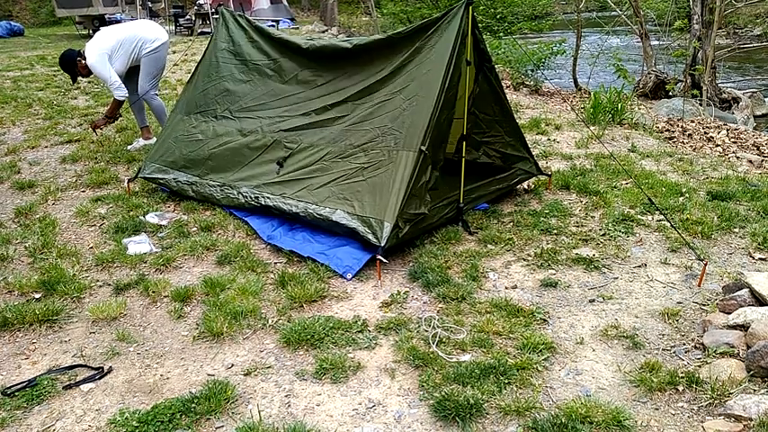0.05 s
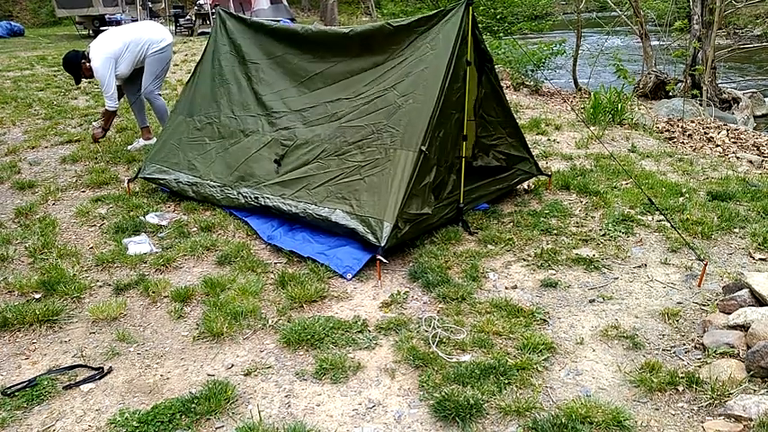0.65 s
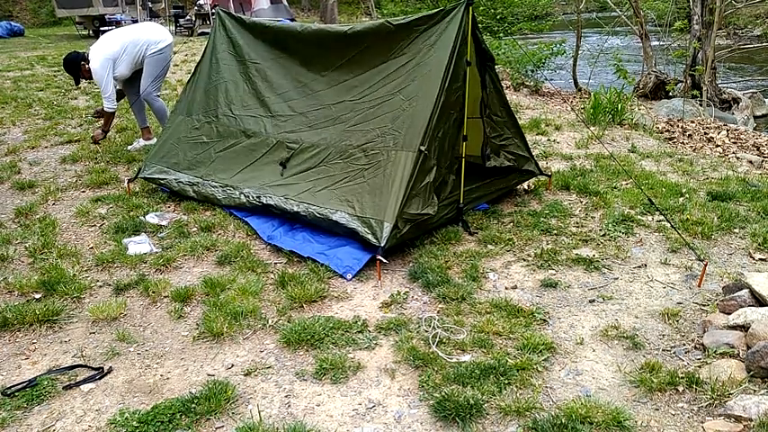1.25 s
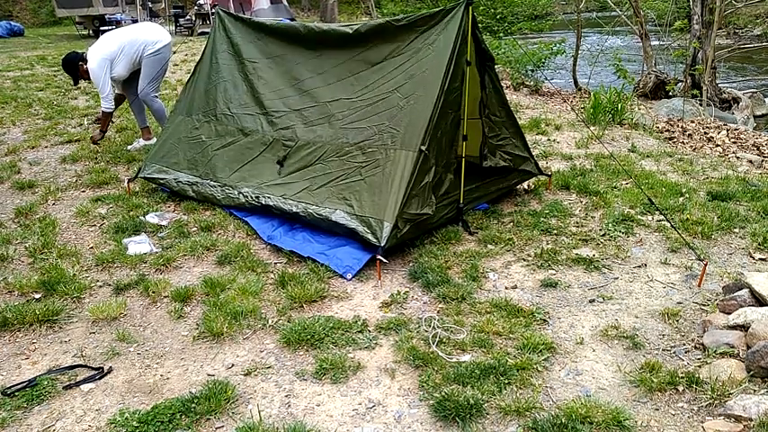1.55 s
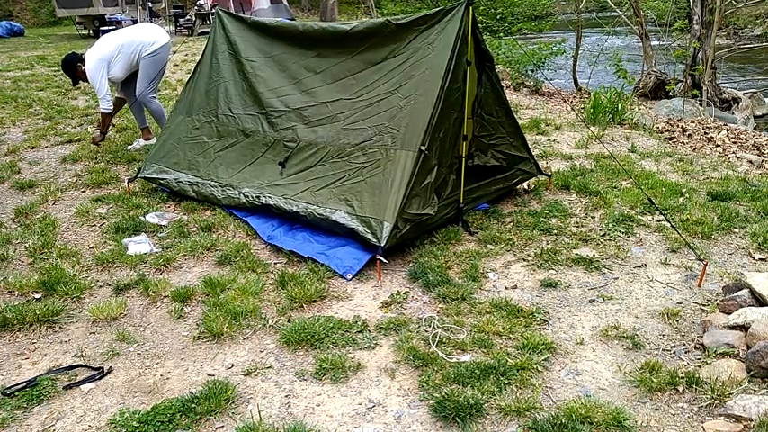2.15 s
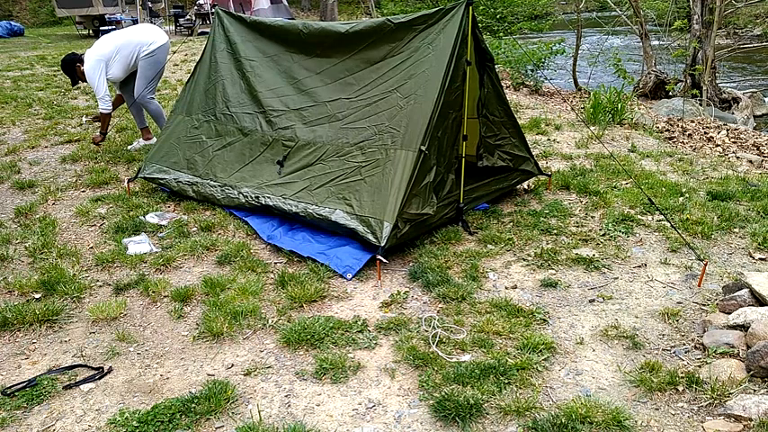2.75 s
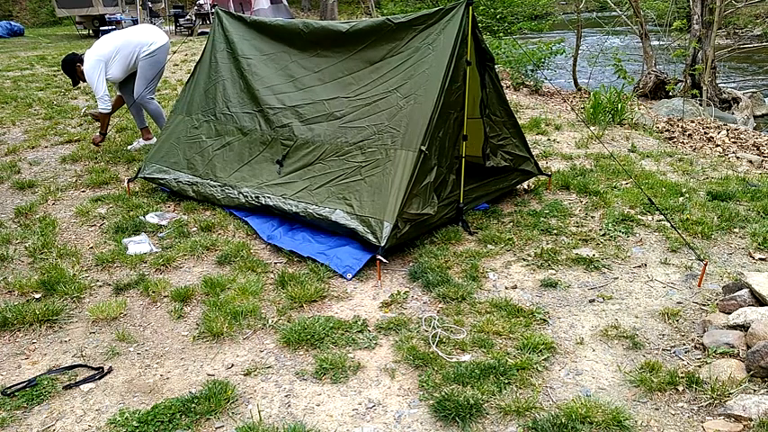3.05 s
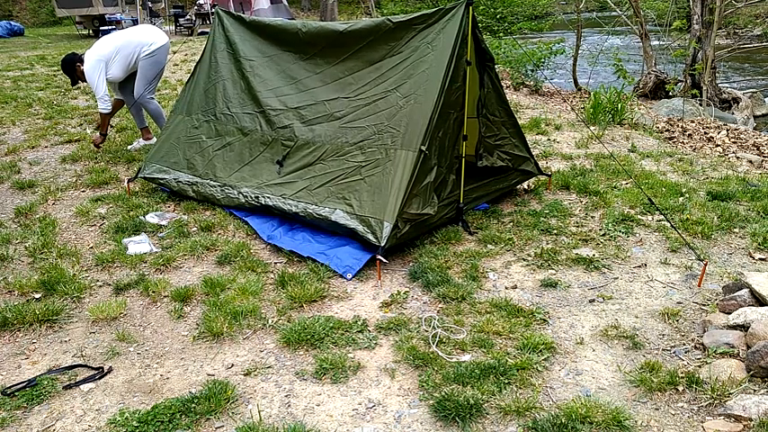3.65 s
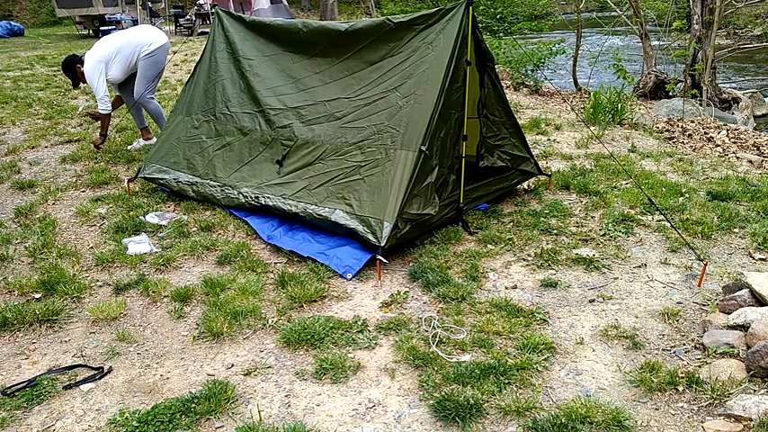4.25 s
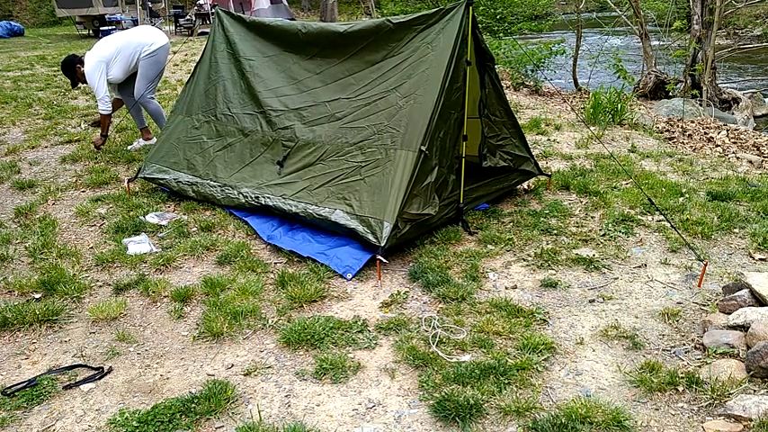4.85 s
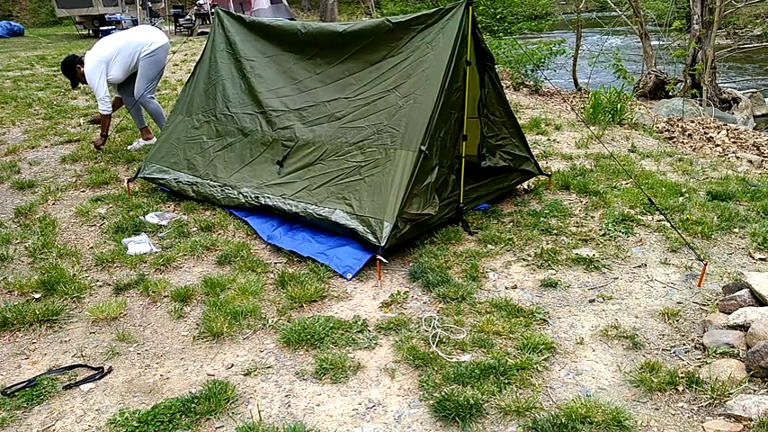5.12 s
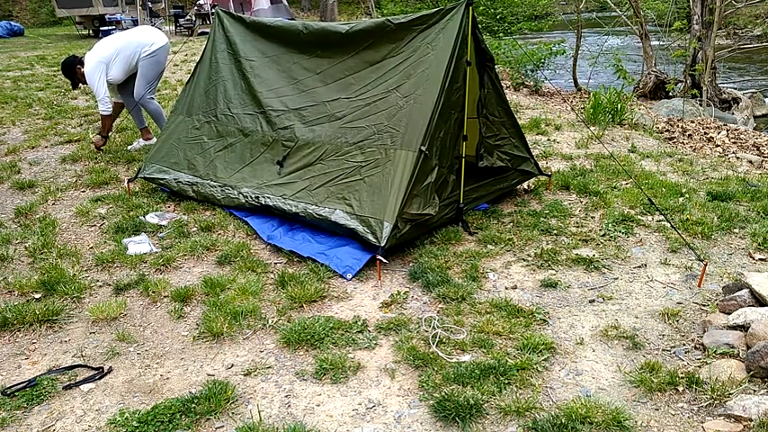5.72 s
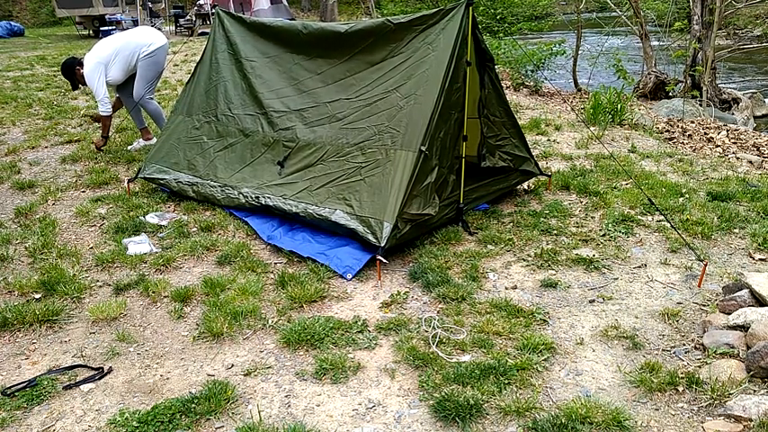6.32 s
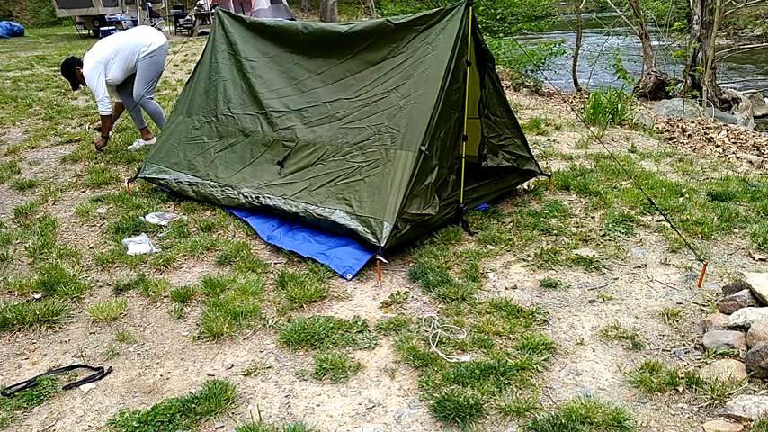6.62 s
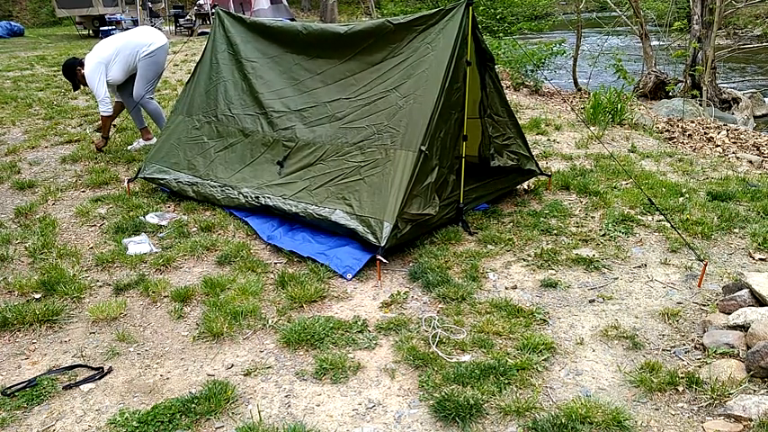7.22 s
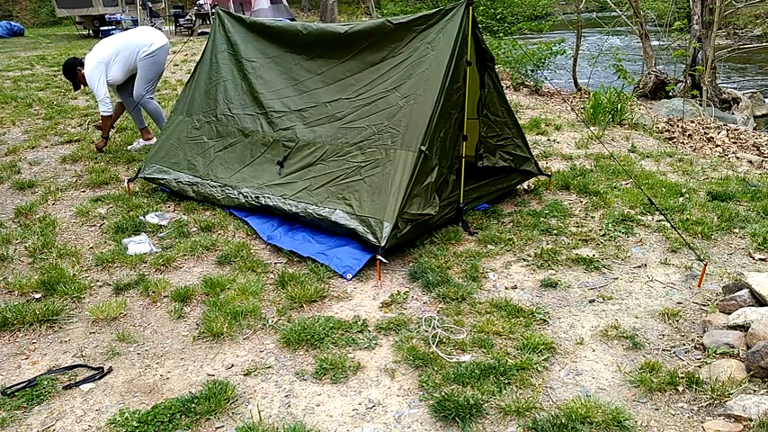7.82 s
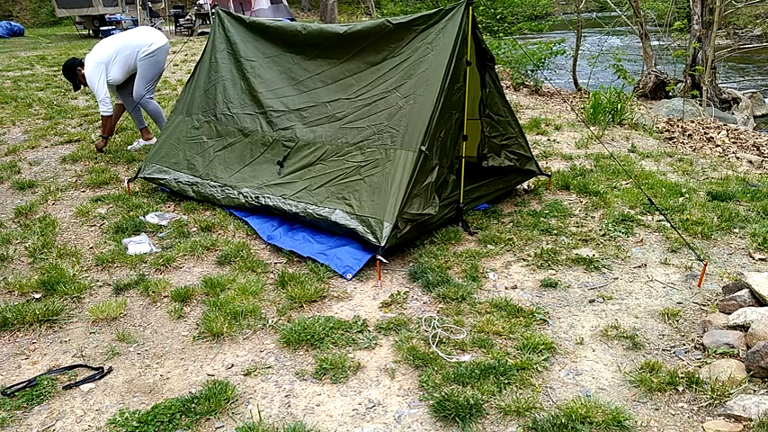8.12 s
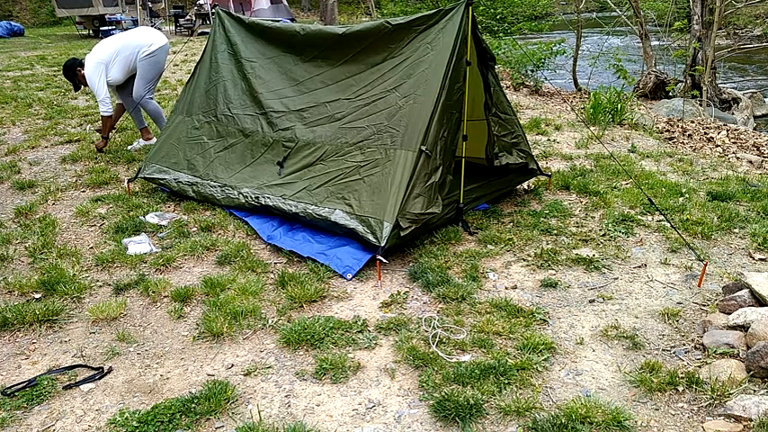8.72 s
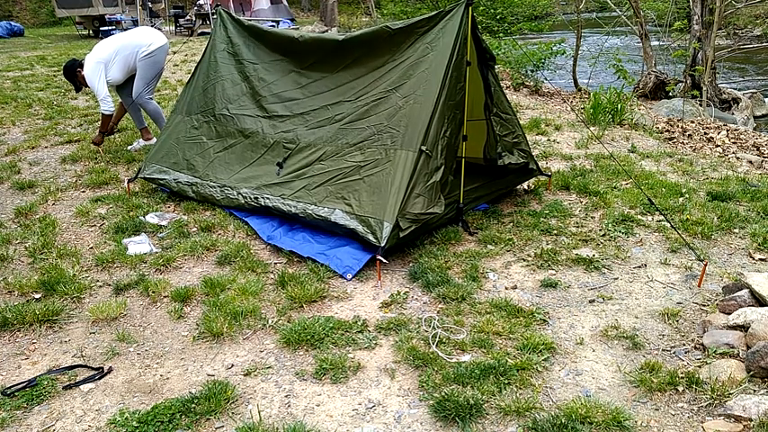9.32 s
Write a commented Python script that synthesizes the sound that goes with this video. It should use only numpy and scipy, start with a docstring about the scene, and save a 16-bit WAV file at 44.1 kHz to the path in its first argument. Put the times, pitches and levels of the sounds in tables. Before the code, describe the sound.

Sharp, bright clicks of a steel tent peg being hammered repeat about four times a second, after a brief opening of river noise and low wind bumps on the microphone's left side. Each strike has a thin ring and a soft outdoor tail, gaining a little thud as the soil grips. Two late blows glance off as lighter ticks. The river keeps rushing and babbling softly behind everything.

```python
"""Driving a tent peg by a river

A steel peg is tapped into firm ground about four times a second; two blows glance off. Each impact
excites bending modes: a clack, a falling clink and a thin high ring. As the soil grips, the thud grows.
Tent and trees scatter a soft tail. The river rushes, leaves hiss and gusts buffet the phone's left port,
while its noise suppressor opens briefly after every blow."""
import sys
import numpy as np
from scipy import signal
from scipy.fft import rfft, irfft, next_fast_len
from scipy.io import wavfile
from scipy.ndimage import uniform_filter1d, map_coordinates

SR = 44100
rng = np.random.default_rng(int(sys.argv[2]) if len(sys.argv) > 2 else 0)


def unload_wav(signal):
    """Save mono or channel-first audio to the path in sys.argv[1] as 16-bit WAV at rate SR, clipped to [-1, 1]."""
    wavfile.write(
        sys.argv[1],
        SR,
        np.round(np.clip(np.atleast_2d(signal).T, -1, 1) * 32767).astype(np.int16),
    )


N = 417627
TIME = np.arange(N) / SR
CLINK_HZ = 4000  # the peg's lowest strong mode

# Square blows. Each row: start in seconds, clack level in dB, brightness in dB, shaft note in Hz, its
# level in dB, upper shaft note in dB, head note in Hz, its level in dB, rebound delay in seconds, rebound
# in dB, clink in dB, high ring in dB, thud in dB, soil note in Hz. Levels are relative.
BLOW_STROKES = [(1.7203, -17.5, -5, 3300, 6, 17.5, 7170, 22.5, 0.00069, -8, -27.0, -46.0, -48.0, 170.0),
                (2.2732, -19.5, -9.5, 3550, 10, -7, 8800, 1, 0.00055, -5, -35.5, -55.0, -54, 142.0),
                (2.5128, -18, -4.5, 3410, 2, -7, 6350, 3.0, 0.00062, -17, -23, -50.0, -38, 170.0),
                (2.7551, -18.5, -11, 3230, 12, 11, 10300, 6, 0.00066, 1.5, -28.0, -46.0, -42, 147.0),
                (2.9979, -17, -4, 3300, -7, 7.5, 9130, -1, 0.00057, -6.5, -22.5, -44.0, -33.0, 137.0),
                (3.2426, -15.5, -11, 3290, 2.5, 11.5, 6730, 3.0, 0.00063, -10, -24.0, -36, -35, 139.0),
                (3.4846, -16, -5.5, 3360.0, -4.5, 5, 7360.0, 4, 0.00057, -4.5, -25.5, -40, -32.5, 137.0),
                (3.732, -15.5, -10.5, 3240, 1, 1, 6830, 12, 0.00034, -12, -30, -55.0, -35, 140),
                (3.9712, -18, -9.5, 3800, -9, 9, 9760.0, -3, 0.00035, -8, -32, -47.0, -32, 154.0),
                (4.2053, -18, -7, 3660, 5.5, -19, 10000, -2, 0.00032, -12, -18.5, -35, -30, 132.0),
                (4.4381, -18, -6.5, 4700, -5, 6, 7640, 10, 0.00043, -8.5, -24, -28.5, -28, 144.0),
                (4.6718, -21, -0.5, 4340, 10.5, -7.0, 9400, -10, 0.00062, -10, -22, -34.0, -29.0, 147),
                (4.9062, -18.5, 15, 4550, 6, 1, 6920, 23, 0.00032, -9.0, -30, -31.0, -28.5, 162.0),
                (5.1317, -21.5, 6.0, 3330.0, -2, 0, 8820.0, 19, 0.0005, -2, -30.5, -35, -28.5, 160.0),
                (5.3662, -19.5, -5.0, 4300, -1, 11, 9550, -1, 0.00104, -8, -21, -46, -28.5, 150),
                (5.5918, -20.5, 1.0, 3360, 2, 9, 6010.0, 7, 0.00096, -1, -25, -51, -27.0, 165),
                (5.8343, -17.0, -12.5, 4280, 2.5, -15.0, 8590.0, -14, 0.00138, -18, -18, -33, -27.5, 150.0),
                (6.0622, -20, 2, 4600, 3.5, -22, 8800, 12.5, 0.0005, -12, -30, -27, -27.5, 157),
                (6.2942, -20, 1.5, 4660.0, -1, -21, 8850, 3, 0.000585, -8.0, -30, -36, -28.5, 155.0),
                (6.5287, -19.0, -6, 3180, -15, 2, 6680, 11, 0.00086, -5, -33, -42.0, -28.5, 162.0),
                (6.7569, -16.5, -12, 3400, -6, 6, 7930.0, 3, 0.00029, -8, -19.0, -21.5, -29.5, 133),
                (7.2865, -18.5, -6, 4330, 4, -19, 7200, -11, 0.00031, -8, -21.5, -37.0, -29, 156.0),
                (7.5133, -22, 2, 4550.0, 10, 18.5, 9450.0, 6, 0.00097, -6, -25, -38.0, -27.5, 149.0),
                (7.7443, -19, -11, 4240, 13, -17, 10130.0, 1, 0.00097, 1, -18, -37.0, -27, 162.0),
                (8.2226, -20, -5.5, 4300, 7, -19, 6780.0, -11, 0.00066, -21, -18.5, -32, -25.5, 155.0),
                (8.438, -20.5, -7, 4440, 8, -23, 9810.0, 1, 0.0013, -10, -24, -35.0, -26.5, 160.0),
                (8.6611, -20, -1, 4600, 5, 18, 9360, 4, 0.00043, -3, -24, -36, -26, 170.0),
                (8.8872, -26, 11, 4560, 19, 18, 8800, 15, 0.0004, -7, -28, -37.0, -24, 153.0)]
def blows(held_blows=.9):
    """Impact excites peg and soil: returns clacks as (start, sound), a ringing track and a thud track."""
    clacks, rings, ground = [], np.zeros(N), np.zeros(N)
    t = np.arange(SR // 3) / SR
    for k, (start, db, *contact, clink_db, ring_db, thud_db, soil_hz) in enumerate(BLOW_STROKES):
        free = 1 - np.exp(-k / held_blows)  # the hand lets go of the peg
        clacks.append((start, undb(db + 0.4) * clack(*contact, free)))
        add(rings, start, undb(ring_db - 0.5) * high_ring(t) + undb(clink_db) * clink(t))
        add(ground, start, undb(thud_db - 1) * thud(t, soil_hz))
    return clacks, rings, ground


# Modes of peg and striker. Each row: frequency in Hz, relative level in dB, 60 dB decay time in seconds.
CLACK_MODES = [(3423, -8.5, 0.0044), (4390, -3.5, 0.0049), (5180, 5, 0.0047), (6270, 1.5, 0.0053),
               (6800, 9, 0.0047), (7600, 14.5, 0.0017), (8940, 8.5, 0.0049), (9620, 6, 0.0027),
               (11060, 8, 0.0086), (11850, 2.5, 0.0056), (13460, 7.5, 0.0048), (15300, 15.5, 0.0013)]
def clack(bright_db, shaft_hz, shaft_db, upper_db, head_hz, head_db, rebound_s, rebound_db, free):
    """Modal superposition: the striker lands twice, ringing the head, bending the shaft, crunching grit."""
    t = np.arange(SR // 20) / SR
    hz, db, t60 = np.transpose(CLACK_MODES)[..., None]
    tilt_db = bright_db * np.tanh(2 * np.log2(hz / 7500))  # harder contact favours the upper modes
    gain = undb(db + 1.07 * rng.standard_normal(hz.shape) + tilt_db)
    gain[::2] *= -1  # neighbouring modes swing opposite ways at the head
    head = undb(head_db) * damped(t, head_hz, t60=0.0063)
    contact = np.sum(gain * damped(t, hz, t60), axis=0) + head
    rebound = undb(rebound_db) * map_coordinates(contact, [(t - rebound_s) * SR])
    shaft = undb(shaft_db) * damped(t, shaft_hz, t60=0.0093)
    shaft += undb(upper_db) * damped(t, hz=5150, t60=0.0093)
    radiated = band(contact + rebound + shaft, 3210, 14500, order=4)  # a thin peg radiates little bass
    steel = unit_onset(disperse(radiated))
    grit = unit_onset(band(rng.standard_normal(len(t)), 2300, 11400, order=3) * fade(t, t60=.012))
    low_hz = 2373 * np.exp(0.044 * rng.standard_normal())  # a weak mode, muted while the peg is held
    low_note = free * damped(t, low_hz, t60=0.018) * (1 - np.exp(-t / 0.0011))
    return steel + undb(-19) * grit + undb(-16.5) * low_note


def disperse(x, travel_s=0.001632, steepness=4.05):
    """Dispersion: higher bending waves run down the peg faster, so the low notes arrive last."""
    f = np.fft.rfftfreq(len(x), 1 / SR)
    lag_s = travel_s * (CLINK_HZ / np.maximum(f, CLINK_HZ)) ** steepness
    return irfft(rfft(x) * np.exp(-2j * np.pi * np.cumsum(lag_s) * f[1]), len(x))


def clink(t, travel_s=0.000698, rise_s=0.0028, t60=0.033):
    """Dispersive glide: waves just above the peg's mode run slowly, so the note falls onto its pitch."""
    hz = CLINK_HZ * (1 + 0.006 * rng.standard_normal())
    phase = 2 * np.pi * hz * np.sqrt(t * (t + 2 * travel_s))
    return np.sin(phase) * fade(t, t60) * (1 - np.exp(-(t / rise_s) ** 2))


def high_ring(t, split_hz=43, t60=0.24):
    """Beating: two close modes share the ring according to the direction of the blow."""
    angle = rng.random() * np.pi / 6
    hz = 13410 * (1 + .0008 * rng.standard_normal())
    return np.cos(angle) * damped(t, hz, t60) + np.sin(angle) * damped(t, hz + split_hz, t60)


def thud(t, soil_hz, drop_hz=352, drop_s=0.0033, peak_s=.0033, width_s=.0018):
    """Damped oscillation: the shoved ground shivers briefly as its pitch sinks to the soil's note."""
    # the soil gives a little differently under each blow
    drop_scale, width_scale, decay_scale = np.exp(.18 * rng.standard_normal(3).clip(-1.5, 1.5))
    cycles = soil_hz * t + drop_hz * drop_scale * drop_s * (1 - np.exp(-t / drop_s))
    shove = np.exp(-((t - peak_s) / (width_s * width_scale)) ** 2)
    shiver = undb(-6) * fade(t, t60=.05 * decay_scale) * np.minimum(t / peak_s, 1) ** 2
    return np.cos(2 * np.pi * cycles) * (shove + shiver)


# Glancing blows. Each row: start in seconds, level in dB, change at each further contact in dB.
GLANCING_STROKES = [(6.9935, -33, -0.5), (7.977, -21, -13)]
def glances(skip_s=.0043, contacts=3):
    """Contact chatter: the striker skips off the head's edge in ticks, driving nothing into the soil."""
    ticks = []
    for start, db, step_db in GLANCING_STROKES:
        for k in range(contacts):
            tick = clack(bright_db=2, shaft_hz=4300, shaft_db=2, upper_db=-3, head_hz=9300, head_db=5,
                         rebound_s=0.0014, rebound_db=-4, free=0.53)
            late_s = skip_s * k * (k + 1) / 2  # each skip lasts longer than the last
            ticks.append((start + late_s, undb(db + k * step_db) * tick))
    return ticks


# Distinct reflections off nearby surfaces. Each row: mean delay in seconds, relative level in dB.
EARLY_REFLECTIONS = [(.0058, -38), (.0085, -32), (.013, -46), (0.025, -24), (0.035, -27)]
# Spectrum returned by grass and stones. Each row: frequency in Hz, gain in dB.
NEAR_SPECTRUM = [(2400, -4), (3200, -3), (4000, 3), (5500, -5), (7000, 1), (9000, 11), (10300, 1),
                 (12000, -8)]
# Spectrum returned by tent and trees. Each row: frequency in Hz, gain in dB.
FAR_SPECTRUM = [(200, -19), (1500, -34), (2100, -14), (2500, -3.5), (3100, -4), (3900, 3.5), (5200, 2.5),
                (7000, 3), (9000, 3), (10500, -1.5), (11500, -4), (13500, -1.5), (16000, -33)]
def echoes(hits):
    """Reflection and scattering: ground, tent and trees send back each (start, sound) hit."""
    near, far = np.zeros((2, 2, N))
    for start, hit in hits:
        for late_s, db in EARLY_REFLECTIONS:
            arrival = start + late_s * (1 + 0.038 * rng.standard_normal())
            add(near, arrival, undb(db) * pan(right_db=-16) * hit)
        grass = interference(scatter(db=-15, t60=0.099, samples=SR // 10))
        add(near, start, signal.fftconvolve(hit[None], grass, axes=1))
        # far returns gather sound sent out in all directions, so single notes blur away
        tent = scatter(db=-9.5, t60=0.14)
        trees = scatter(db=-15, t60=0.97)
        add(far, start, np.linalg.norm(hit) * (tent + trees))
    return colour(near, NEAR_SPECTRUM) + colour(far, FAR_SPECTRUM)


def scatter(db, t60, samples=SR, rise_s=0.0013):
    """Diffuse scattering: decaying noise of the given energy, independent at each port."""
    t = np.arange(samples) / SR
    envelope = fade(t, t60) * np.minimum(t / rise_s, 1)
    return undb(db) * rng.standard_normal((2, samples)) * envelope / np.linalg.norm(envelope)


def interference(x, spread_db=5, points=32):
    """Interference: nearby reflections reinforce some notes and cancel others, anew for each blow."""
    gains = unit(undb(spread_db * rng.standard_normal(points).clip(-2, 2)))
    hz = np.linspace(2000, 15000, points)
    return colour(x, np.transpose([hz, 20 * np.log10(gains)]))


# The river with the valley's low rumble. Each row: frequency in Hz, relative spectral density in dB.
RIVER_SPECTRUM = [(30, -26), (55, -12), (85, 4.5), (130, -10), (220, -10), (450, -13), (900, -10.5),
                  (1100, -15.5), (2000, -18.5), (3000, -20.5), (5000, -27.5), (8500, -26.5), (12000, -33),
                  (15000, -43)]
# Brief lifts of the rush just after blows. Each row: start in seconds, length in seconds, rise in dB.
RUSH_LIFTS = [(1.76, 0.053, 1.5), (2.52, 0.1, 3.5), (3.3, 0.72, 1)]
def river(level_db=-47, shared_hz=750, lag_s=0.00031, flicker_db=1.5):
    """Partial coherence: rushing water flickers band by band; the ports share its bass, not its treble."""
    edges_hz = np.geomspace(20, 20000, 11)
    water = np.zeros((3, N))  # common, left only, right only
    for lo, hi in zip(edges_hz, edges_hz[1:]):
        water += band(rng.standard_normal((3, N)), lo, hi) * undb(flicker_db * wander(rate_hz=14))
    share = 1 / (1 + (np.fft.rfftfreq(N, 1 / SR) / shared_hz) ** 2)
    common = np.array([water[0], delay(water[0], lag_s)])
    ports = irfft(rfft(common) * np.sqrt(share) + rfft(water[1:]) * np.sqrt(1 - share), N)
    rush = unit(colour(ports, RIVER_SPECTRUM)) * undb(level_db)
    return rush * swells(RUSH_LIFTS, attack_s=0.14, release_s=0.14) * pan(right_db=-5)


# Narrow bands colouring the river's rush; the upper one drops in pitch near 4 s. Each row: start in
# seconds, length in seconds, lowest and highest starting pitch in Hz, level of the faintest notes in dB.
BABBLE_BANDS = [(0, 9.47, 645, 1010, -49), (0, 4.17, 1276, 1540, -48), (4.098, 5.37, 1170, 1500, -53.5)]
def babble(notes_per_band=330, cycles=45, glide=0.034, right_db=-4):
    """Random superposition: short, slightly rising notes, mostly faint, merge into bands of babble."""
    out = np.zeros((2, N))
    t = np.arange(SR // 10) / SR
    for start, length_s, lo_hz, hi_hz, db in BABBLE_BANDS:
        for when, pitch, strength, turn in rng.random((notes_per_band, 4)):
            hz = lo_hz * (hi_hz / lo_hz) ** pitch
            phase = 2 * np.pi * hz * t * (1 + glide * t * hz / cycles)
            envelope = fade(t, cycles / hz) * (1 - np.exp(-t * hz / 4))
            ports = np.array([np.sin(phase), undb(right_db) * np.sin(phase + 2 * np.pi * turn)])
            gain = undb(db - 3 * np.log(1 - .95 * strength))
            add(out, min(start + when * length_s, TIME[-1]), gain * envelope * ports)
    return out


# Swells of fine high hiss; the long one lingers under the hammering. Each row: start in seconds,
# length in seconds, rise over the quiet hiss in dB.
HISS_SWELLS = [(.45, 0.42, 9), (1.3, 0.12, 3.5), (3.3, 5.68, 10.5)]
def high_hiss(quiet_db=-66.5):
    """Amplitude-modulated noise: a fine high hiss swells and sinks back."""
    hiss = unit(band(rng.standard_normal((2, N)), 6400, 10500)) * undb(quiet_db)
    return hiss * swells(HISS_SWELLS, attack_s=0.18, release_s=0.15) * pan(right_db=-6)


# Gusts on the phone. Each row: start in seconds, length in seconds, rise over the calm rumble in dB.
WIND_GUSTS = [(1.168, 0.11, 21.5), (1.53, 0.16, 18), (4.274, 0.053, 15), (5.13, 0.1, 21.5),
              (5.301, 0.068, 20.5), (6.58, 0.029, 14), (9.09, 0.19, 16)]
def wind(calm_db=-62.5, flutter_db=2.6):
    """Turbulent pressure: a low rumble on each port rises with the gusts."""
    hz_db = [(15, -17), (45, 8.5), (80, 5), (140, -13.5), (260, -15.5), (1000, -25.5), (3000, -54),
             (12000, -86)]
    rumble = unit(colour(rng.standard_normal((2, N)), hz_db))
    rumble *= undb(calm_db + flutter_db * wander(rate_hz=25))
    return rumble * swells(WIND_GUSTS, attack_s=0.099, release_s=0.15) * pan(right_db=-15)


# Eddies on the left port. Each row: centre time in seconds, peak level in dB, swing frequency in Hz.
PORT_EDDIES = [(1.166, -30.5, 89), (1.196, -24.5, 82), (1.2235, -21, 97), (1.232, -26, 79.6),
               (1.27, -29.5, 104), (1.541, -33.5, 82.6), (5.154, -34, 70), (5.192, -34, 60),
               (5.205, -27.5, 71.6), (5.302, -26, 75), (5.311, -32, 156), (6.601, -41.5, 66),
               (9.12, -41, 55), (9.26, -42, 58)]
def eddies():
    """Vortex shedding: gusts shed eddies on the left port, each a push and a pull."""
    out = np.zeros((2, N))
    t = np.arange(SR // 20) / SR
    for centre_s, db, swing_hz in PORT_EDDIES:
        phase = 2 * np.pi * swing_hz * (t - t.mean())
        push_pull = -phase * np.exp((1 - phase ** 2) / 2)
        add(out[0], centre_s - t.mean(), undb(db) * push_pull)
    return out


def canvas(start_s=1.203, rise_s=.012, t60=0.24, level_db=-46, flutter_db=3):
    """Flutter: the strongest gust briefly rustles the tent cloth."""
    envelope = np.clip((TIME - start_s) / rise_s, 0, 1) * fade(TIME - start_s, t60)
    gain = undb(level_db + flutter_db * wander(rate_hz=61.2))
    rustle = unit(band(rng.standard_normal((2, N)), 600, 2600))
    return rustle * envelope * gain * pan(right_db=-4)


def undb(db):
    """Decibels to amplitude gain."""
    return 10 ** (np.asarray(db) / 20)


def pan(left_db=0, right_db=0):
    """Level difference: a gain for each port."""
    return undb([[left_db], [right_db]])


def unit(x):
    """Normalisation to rms 1."""
    return x / np.sqrt(np.mean(x ** 2))


def unit_onset(x):
    """Normalisation to rms 1 over the first 5 ms."""
    return x / np.sqrt(np.mean(x[:SR // 200] ** 2))


def fade(t, t60):
    """Exponential decay from t = 0, by 60 dB in t60 seconds."""
    return (t >= 0) * np.exp(-np.log(1000) * np.abs(t) / t60)


def damped(t, hz, t60):
    """Free vibration of a mode struck at t = 0."""
    return np.sin(2 * np.pi * hz * t) * fade(t, t60)


def colour(x, points):
    """Spectral shaping by a curve through (Hz, dB) points."""
    hz, db = np.transpose(points)
    size = next_fast_len(x.shape[-1])
    f = np.maximum(np.fft.rfftfreq(size, 1 / SR), 1)
    gain = undb(np.interp(np.log(f), np.log(hz), db))
    return irfft(rfft(x, size) * gain, size)[..., :x.shape[-1]]


def band(x, lo_hz, hi_hz, order=2):
    """Band-pass filtering."""
    return signal.sosfilt(signal.butter(order, [lo_hz, hi_hz], "band", fs=SR, output="sos"), x)


def delay(x, seconds):
    """Time delay, rounded to whole samples."""
    return np.pad(x, (round(seconds * SR), 0))[:len(x)]


def wander(rate_hz):
    """Smooth random modulation of rms 1."""
    step = int(SR / rate_hz)
    held = np.repeat(rng.standard_normal(N // step + 1), step)
    return unit(uniform_filter1d(held, step)[:N])


def swells(rows, attack_s, release_s):
    """Gain envelope: each (start s, length s, dB) row rises, holds and sinks back."""
    shapes = [np.interp(TIME, [s - attack_s, s, s + length, s + length + release_s], [0, db, db, 0])
              for s, length, db in rows]
    return undb(np.max(shapes, axis=0))


def add(track, start_s, sound):
    """Superposition of a sound onto a track."""
    i = round(start_s * SR)
    track[..., i:i + sound.shape[-1]] += sound[..., :N - i]


def scene(port_lag_s=.000186):
    """Arrival-time difference: the blows reach the right port first, over river, hiss and wind."""
    clacks, steel, ground = blows()
    hits = clacks + glances()
    for start, hit in hits:
        add(steel, start, hit)
    direct = steel * pan(0.54, -0.54) + ground * pan(2.5, -2.5)
    direct[0] = delay(direct[0], port_lag_s)
    peg = direct + echoes(hits) * pan(0.5, -0.5)
    return peg + river() + babble() + high_hiss() + wind() + eddies() + canvas()


def smooth(x, tau_s):
    """Exponential averaging with time constant tau_s."""
    keep = np.exp(-1 / (tau_s * SR))
    return signal.lfilter([1 - keep], [1, -keep], x)


def suppressor(x, threshold_db=-40.5, lift_db=6, top_hz=2800):
    """Dynamic expansion: a loud sound lifts the lows and mids, which sink back in the quiet."""
    power = smooth(np.mean(x ** 2, axis=0), tau_s=0.024)
    opening = smooth(power / (power + undb(threshold_db) ** 2), tau_s=0.015)
    lows = signal.sosfiltfilt(signal.butter(2, top_hz, fs=SR, output="sos"), x)
    return x + lows * (undb(lift_db * opening) - 1)


def record(dry, low_cut_hz=37, top_hz=16250, ceiling=1.4):
    """Band limiting and saturation: the phone cuts both extremes, suppresses noise and rounds peaks."""
    thin = signal.sosfilt(signal.butter(4, low_cut_hz, "high", fs=SR, output="sos"), dry)
    ports = ceiling * np.tanh(suppressor(thin) / ceiling)
    ports[1] *= -1  # the right port has opposite polarity
    return signal.sosfilt(signal.ellip(8, .2, 70, top_hz, fs=SR, output="sos"), ports)


dry = scene()
out = record(dry)
unload_wav(out)
```